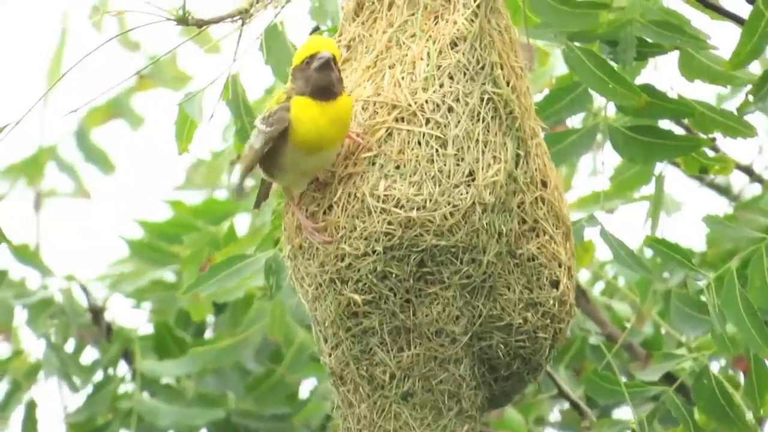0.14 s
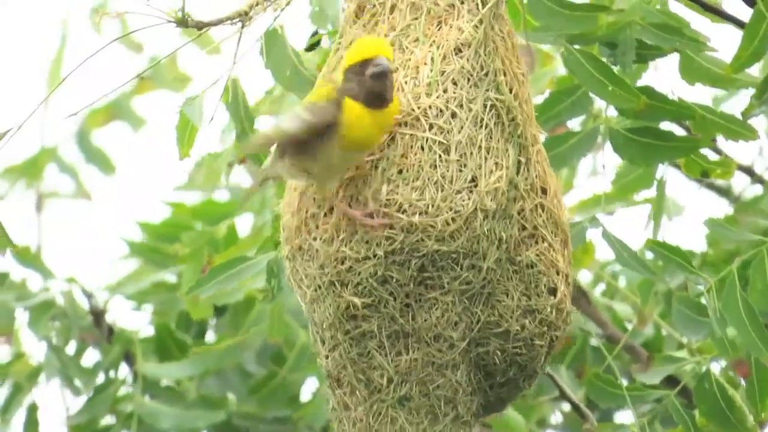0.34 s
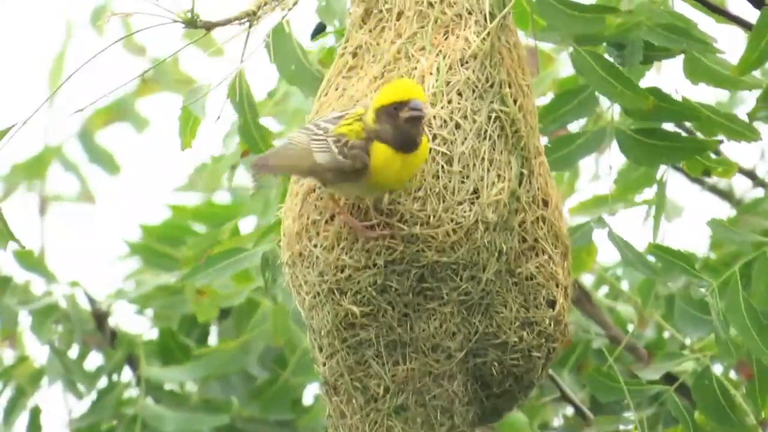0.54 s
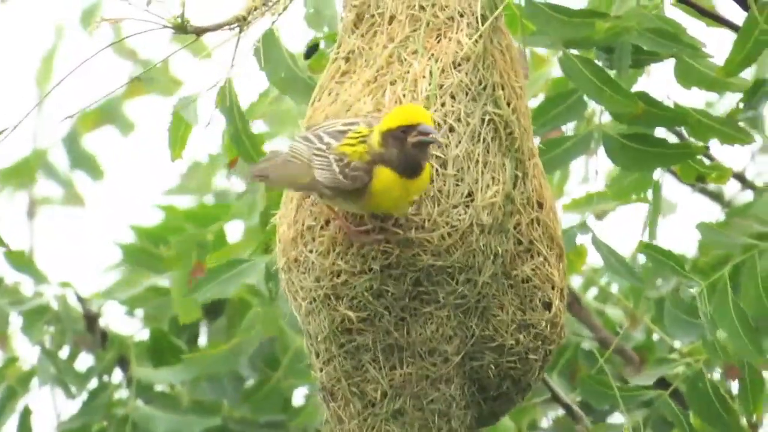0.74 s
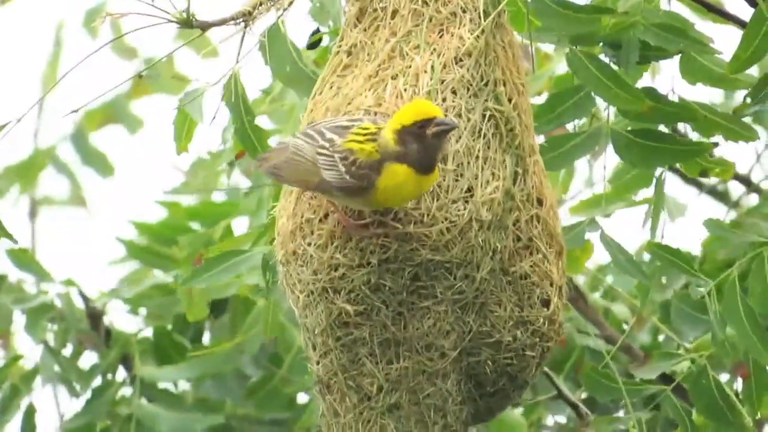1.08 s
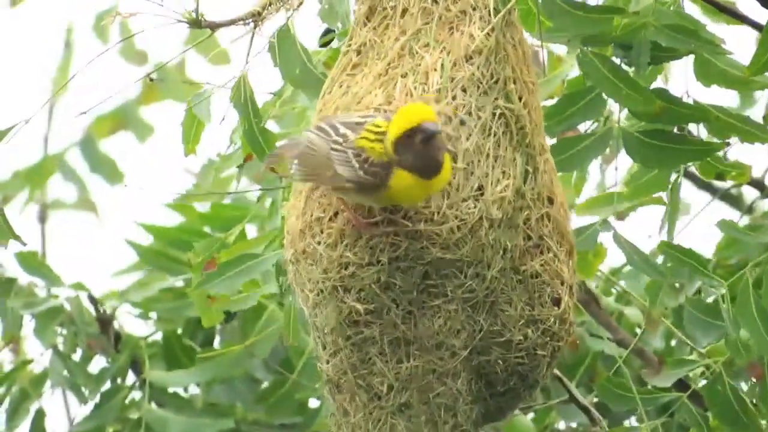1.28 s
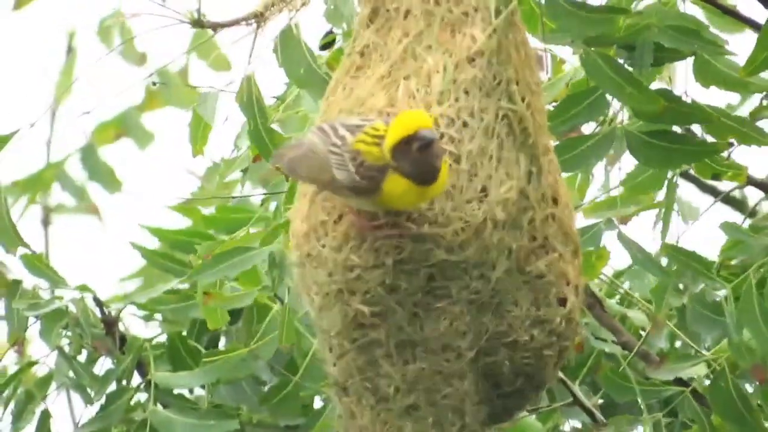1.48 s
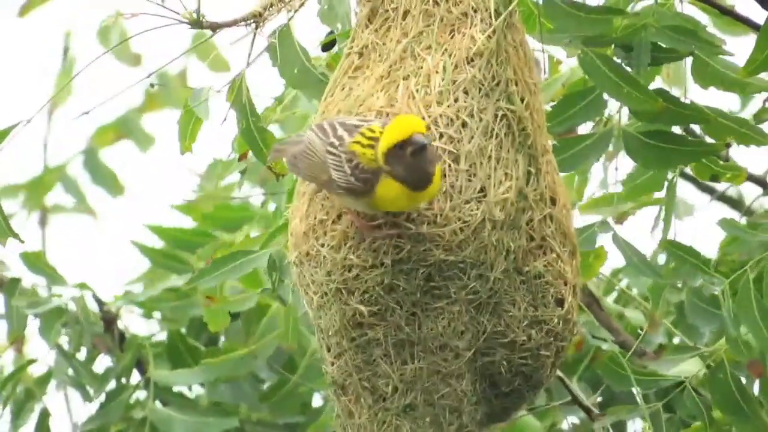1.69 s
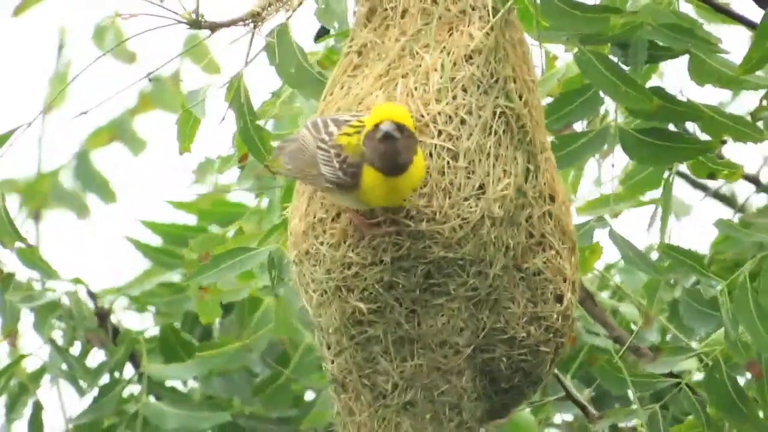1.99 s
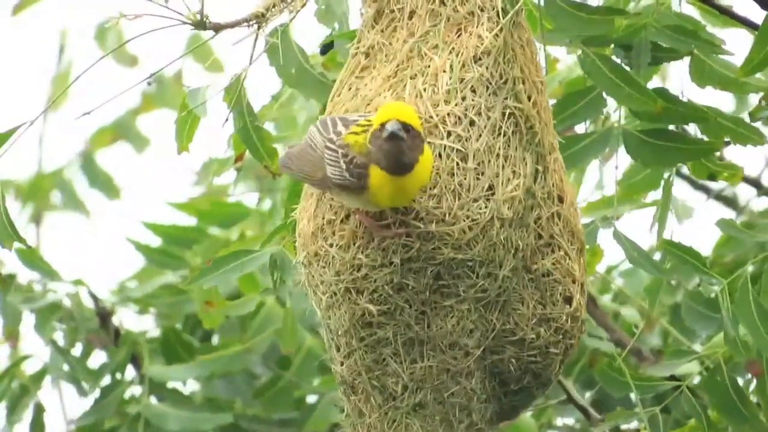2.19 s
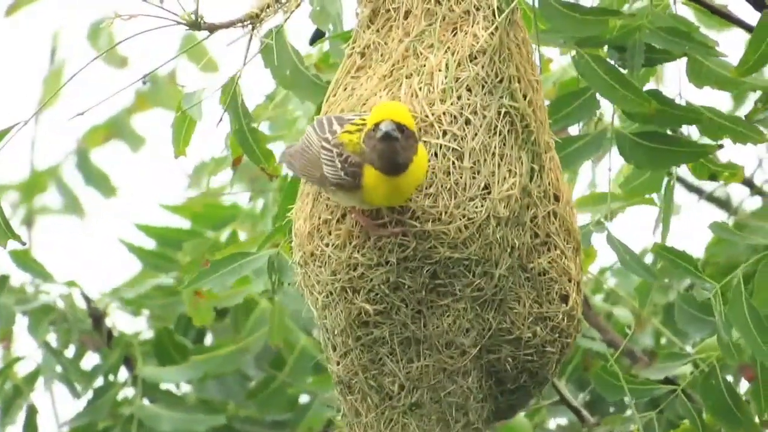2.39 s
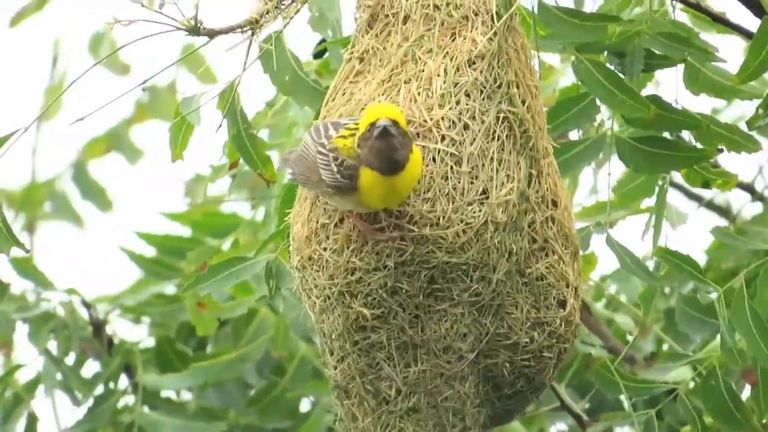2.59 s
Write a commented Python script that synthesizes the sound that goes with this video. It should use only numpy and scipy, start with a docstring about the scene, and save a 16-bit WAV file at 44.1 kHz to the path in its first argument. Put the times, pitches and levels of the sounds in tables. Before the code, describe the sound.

Buzzy chattering of small weaver birds turns to a rising whistle and fluttering wheeze in soft outdoor air

```python
"""Two weavers chatter in buzzy two-voiced trills of quick chips, one topping near 4.5 kHz, the other rougher and
higher near 5 kHz; short notes slide among them and neighbours rasp in swarms of tiny falling chirps.
From 1.6 s thin near-sine whistles follow, one a long upward slide; from 2.4 s a two-voiced wheeze closes the
scene, each voice a line with fluttering side lines. Throughout, leaves scatter the calls as a sparse echo,
over soft wind and hiss made of random spectra."""
import sys
import numpy as np
from scipy import signal
from scipy.io import wavfile
from scipy.ndimage import uniform_filter1d

SR = 44100
rng = np.random.default_rng(int(sys.argv[2]) if len(sys.argv) > 2 else 0)


def to_wav(sig):
    """Store sig (one row per channel, or 1-D mono) as 16-bit WAV at the path in sys.argv[1].

    Samples outside -1..1 are clipped; the rate is SR.
    """
    pcm = np.clip(np.atleast_2d(sig), -1, 1) * 32767
    pcm = np.round(pcm).astype(np.int16)
    wavfile.write(sys.argv[1], SR, pcm.T)  # frames by channels


def elevation(decibels):
    """Turn decibel levels (scalar or array-like) into linear amplitude ratios."""
    levels = np.asarray(decibels, float)
    return 10 ** (levels / 20)


N = 120834  # samples, 2.74 s


def evened(x):
    """Scale to rms 1."""
    return x / np.sqrt(np.mean(x ** 2) + 1e-20)


def read(points, hz):
    """Interpolate a spectrum table over log frequency."""
    f_hz, value = np.transpose(points)
    return np.interp(np.log(hz + 1), np.log(f_hz + 1), value)


def add(mix, start_s, sound):
    """Add a sound into the mix at start_s, cut at the end of the mix."""
    part = mix[max(round(start_s * SR), 0):][:len(sound)]
    part += sound[:len(part)]


def wander(size, rate_hz):
    """Random drift of rms 1: noise low-passed at rate_hz."""
    noise = rng.standard_normal(size + 2000)
    settled = signal.lfilter(*signal.butter(2, rate_hz, fs=SR), noise)[2000:]
    return evened(settled)


def voice(hz, octave_db):
    """One side of the syrinx: a sine of rms 1 plus a weak octave."""
    phase = 2 * np.pi * (np.cumsum(hz) / SR + rng.random())
    return np.sqrt(2) * (np.sin(phase) + elevation(octave_db) * np.sin(2 * phase))


def slide(hz, flat, hoarse, octave_db):
    """A short stroke of the voice along a pitch path; hoarseness shakes both level and pitch."""
    grit_rate_hz, shake_hz = 600, 210
    size = len(hz)
    grit = (1 + hoarse * wander(size, grit_rate_hz)) / np.sqrt(1 + hoarse ** 2)
    shape = np.sin(np.linspace(0, np.pi, size)).clip(0) ** flat
    shaken_hz = hz + hoarse * shake_hz * wander(size, grit_rate_hz)
    return shape * grit * voice(shaken_hz, octave_db)


# trills of both birds: start t/s, length/s, nominal top f/Hz, upper voice level/dB, lower voice level/dB,
# hoarseness (0-1)
TRILL_ROWS = [(.0, 0.027, 4402, -59, -55.5, 0.4), (0.025, 0.0606, 4510, -56.5, -56.5, 0.49),
              (.168, 0.0719, 4566, -53, -57.5, .38), (0.249, 0.0631, 4489, -54, -57.5, .33),
              (0.321, 0.0618, 4477, -51.5, -56, .3), (.395, 0.05066, 4540, -52, -56, 0.28),
              (.495, 0.06064, 5098, -50, -55.5, 0.68), (.627, 0.0293, 4930, -54.5, -53, 0.81),
              (0.644, 0.059, 5144, -50, -55, 0.5), (0.749, 0.0515, 4759, -59, -52.5, 0.57),
              (0.796, .046, 5199, -50.5, -57, 0.8), (0.873, 0.0551, 4847, -55, -53, 0.78),
              (0.982, .06, 5231, -52.5, -60, .75), (1.132, 0.0575, 4723, -57.5, -62, 0.49),
              (1.221, .058, 4620, -55.5, -60.5, 0.42), (1.29, 0.069, 4466, -57.5, -58.5, 0.16),
              (1.366, 0.0668, 4432, -59.5, -58, 0.27), (1.441, 0.071, 4485, -60, -60.5, 0.15),
              (1.516, 0.0473, 4455, -62, -60, 0.36)]
CHIPS_PER_S, TRILL_EDGE_S, TRILL_SAG = 81, .00083, .015  # sag: share of pitch
CHIP_SPREAD_DB, CHIP_SPREAD, CHIP_JITTER_S = 1.7, .014, .002  # rms; jitter when fully hoarse
UPPER_S, UPPER_RISE, UPPER_FALL, UPPER_PEAK = .013, .12, .15, .42  # shares of pitch; peak: share of time
OPENING_RISE = .1  # the first chip climbs from further down
LOWER_S, LOWER_LAG_S, LOWER_FROM_HZ, LOWER_END_HZ = .012, .007, 4300, 2850
TRILL_OCTAVE_DB = -27
HISS_DB, HISS_LOW_HZ, HISS_HIGH_HZ = -4, 3600, 5900  # re upper voice, fully hoarse


def trills():
    """Quick chips: an upper voice arches in pitch, a lagging lower voice sweeps down, the throat hisses."""
    out = np.zeros(N)
    up = np.linspace(0, 1, int(UPPER_S * SR))
    low = np.linspace(0, 1, int(LOWER_S * SR)) ** 0.8584
    rise = UPPER_RISE * (1 - up / UPPER_PEAK) ** 2
    fall = UPPER_FALL * ((up - UPPER_PEAK) / (1 - UPPER_PEAK)) ** 2
    arch = 1 - np.where(up < UPPER_PEAK, rise, fall)
    throat = signal.butter(2, [HISS_LOW_HZ, HISS_HIGH_HZ], "band", fs=SR)
    for start_s, length_s, top_hz, up_db, low_db, hoarse in TRILL_ROWS:
        t = np.arange(0, length_s, 1 / SR)
        hiss = evened(signal.lfilter(*throat, rng.standard_normal(SR // 10)))[:len(t)]
        trill = hoarse ** 2 * elevation(up_db + HISS_DB) * hiss
        for chip_s in np.arange(0, length_s, 1 / CHIPS_PER_S):
            up_luck, low_luck, up_level, low_level, lag_luck = rng.standard_normal(5)
            chip_hz = top_hz * (1 - TRILL_SAG * chip_s / length_s + CHIP_SPREAD * up_luck)
            opening = 1 - OPENING_RISE * (chip_s == 0) * (1 - up) ** 4
            upper = slide(chip_hz * arch * opening, .42, hoarse, TRILL_OCTAVE_DB)
            add(trill, chip_s, elevation(up_db + CHIP_SPREAD_DB * up_level) * upper)
            end_hz = LOWER_END_HZ * (1 + 2 * CHIP_SPREAD * low_luck)
            lower = slide(LOWER_FROM_HZ * (1 - low) + end_hz * low, .11, hoarse, TRILL_OCTAVE_DB)
            lower_s = chip_s + LOWER_LAG_S + hoarse * CHIP_JITTER_S * lag_luck
            add(trill, lower_s, elevation(low_db + CHIP_SPREAD_DB * low_level) * lower)
        edges = np.clip(np.minimum(t, length_s - t) / TRILL_EDGE_S, 0, 1)
        add(out, start_s, trill * edges)
    return out


# short sliding notes: start t/s, length/s, from f/Hz, to f/Hz, level/dB
NOTE_ROWS = [(.3, 0.0363, 2200, 2230, -63.5), (.403, 0.0192, 3206, 2880, -52.5),
             (0.563, 0.0209, 4076, 3218, -53.5), (0.682, 0.0112, 3423, 3300, -55),
             (0.709, 0.0289, 4180, 3150, -55), (0.726, 0.0173, 6980, 4924, -63.5),
             (0.8, 0.0117, 3407, 3280, -52.5), (0.844, 0.022, 3972, 3415, -51),
             (0.92, 0.016, 3517, 3302, -50.5), (1.054, 0.0162, 3946, 3410, -53.5),
             (1.068, 0.0193, 3370, 2480, -63), (0.553, 0.0155, 3367, 3287, -52),
             (1.185, 0.0538, 3728, 3642, -60)]
NOTE_HOARSE, NOTE_OCTAVE_DB = .38, -21


def notes():
    """Single strokes of a slightly hoarse voice, each sliding between two pitches."""
    out = np.zeros(N)
    for start_s, length_s, from_hz, to_hz, db in NOTE_ROWS:
        u = np.arange(0, length_s, 1 / SR) / length_s
        hz = from_hz + (to_hz - from_hz) * u ** 1.42
        add(out, start_s, elevation(db) * slide(hz, .5, NOTE_HOARSE, NOTE_OCTAVE_DB))
    return out


def curve(rows):
    """Start time, soft ends and the columns of a table at audio rate."""
    edge_s = .0056
    rows = np.transpose(rows)
    t = np.arange(rows[0][0], rows[0][-1], 1 / SR)
    ends = np.clip(np.minimum(t - t[0], t[-1] - t) / edge_s, 0, 1)
    return t[0], ends, [np.interp(t, rows[0], column) for column in rows[1:]]


# whistles, one list each: t/s, f/Hz, level/dB
WHISTLE_PATHS = [
    [(1.675, 2138, -73), (1.685, 2148, -69), (1.715, 2398, -62), (1.731, 2507, -63), (1.741, 2515, -57),
     (1.759, 2616, -55), (1.801, 2752, -57), (1.857, 2832, -58), (1.889, 2861, -73), (1.909, 2869, -57),
     (1.943, 2886, -56), (1.957, 2892, -64), (1.987, 2904, -66), (2.005, 2911, -56), (2.119, 2934, -53),
     (2.217, 2933, -54), (2.235, 2934, -68)],
    [(2.322, 3964, -71), (2.33, 3890, -60), (2.352, 3927, -52), (2.386, 3963, -54), (2.398, 3904, -54),
     (2.408, 3807, -66)],
    [(1.64, 5150, -80), (1.66, 4850, -74), (1.7, 4420, -70), (1.73, 4230, -68), (1.775, 4110, -69),
     (1.8, 4050, -80)],
]


def whistles():
    """Near-pure tones of the syrinx along smoothed pitch paths, slightly unsteady in pitch and level."""
    level_wander_db, pitch_wander_hz, octave_db = .79, 4, -42
    out = np.zeros(N)
    for rows in WHISTLE_PATHS:
        start_s, ends, (hz, db) = curve(rows)
        level = elevation(db + level_wander_db * wander(len(hz), 60))
        pitch_hz = uniform_filter1d(hz, 600) + pitch_wander_hz * wander(len(hz), 32)
        add(out, start_s, ends * level * voice(pitch_hz, octave_db))
    return out


# wheeze voices: t/s, main line f/Hz, main line level/dB, flutter depth (0-1)
WHEEZE_LOW_PATH = [(2.4, 3950, -75, .1), (2.42, 3960, -67, .2), (2.5, 3985, -64.5, .3),
                   (2.56, 4030, -63.5, .3), (2.59, 4040, -67, .6), (2.64, 4055, -64, .95),
                   (2.75, 4050, -64.5, .99)]
WHEEZE_HIGH_PATH = [(2.404, 5250, -67, .9), (2.425, 5480, -64.5, .8), (2.455, 5534, -60, .5),
                    (2.5, 5534, -63, .6), (2.55, 5528, -66.5, .8), (2.6, 5530, -65.5, .7),
                    (2.65, 5535, -68, .9), (2.75, 5535, -64, .8)]
# side lines: multiple of the flutter rate, level/dB at depth 0, level/dB at depth 1 (both re main line)
LOW_SIDE_LINES = [(-3, -14, -7), (-2, -7, 2), (-1, -4, -8), (1, -9, -12), (2, -10, -7), (3, -16, -11),
                  (5, -9, -12), (6, -8, -9), (7, -15, -10)]
HIGH_SIDE_LINES = [(-3, -18, -13), (-2, -4, -7), (-1, -13, -8), (1, -15, -3), (2, -18, -14)]
FLUTTER_FROM_HZ, FLUTTER_TO_HZ, FLUTTER_WANDER_HZ = 143, 134, 3.5
WHEEZE_WANDER_HZ, WHEEZE_SETTLE_S, WHEEZE_OCTAVE_DB = 15, .035, -37  # wander: once settled
MAIN_WANDER_DB, SIDE_WANDER_DB = 1.6, 3.2


def wheeze():
    """Two fluttering voices: each a main line, unsteady at first, with side lines at flutter multiples."""
    out = np.zeros(N)
    for rows, sides in ((WHEEZE_LOW_PATH, LOW_SIDE_LINES), (WHEEZE_HIGH_PATH, HIGH_SIDE_LINES)):
        start_s, ends, (hz, db, depth) = curve(rows)
        size = len(hz)
        flutter_hz = np.linspace(FLUTTER_FROM_HZ, FLUTTER_TO_HZ, size)
        flutter_hz = flutter_hz + FLUTTER_WANDER_HZ * wander(size, 46.6)
        unsteady = 1 + 3 * np.exp(-np.arange(size) / SR / WHEEZE_SETTLE_S)
        pitch_hz = hz + WHEEZE_WANDER_HZ * unsteady * wander(size, 61)
        lines = voice(pitch_hz, WHEEZE_OCTAVE_DB) * elevation(MAIN_WANDER_DB * wander(size, 40))
        for multiple, shallow_db, deep_db in sides:
            side_db = shallow_db + (deep_db - shallow_db) * depth + SIDE_WANDER_DB * wander(size, 70)
            lines = lines + elevation(side_db) * voice(pitch_hz + multiple * flutter_hz, WHEEZE_OCTAVE_DB)
        add(out, start_s, ends * elevation(db) * lines)
    return out


# neighbours' rasps: start t/s, length/s, centre f/Hz, nominal width/Hz, level/dB before the edge taper
RASP_ROWS = [(0.018, 0.118, 4310, 2675, -57), (0.289, 0.152, 3977, 2700, -52.5),
             (0.388, .016, 5470, 1500, -57), (0.499, 0.113, 7938, 3000, -74),
             (0.649, 0.087, 8000, 2980, -73.5), (0.782, 0.1193, 7920, 1940, -63.5),
             (0.979, 0.071, 8100, 1500, -69.5), (0.82, .27, 4644, 2887, -57.5),
             (.54, 0.065, 4607, 2400, -59), (.69, .04, 5290, 1500, -54.5),
             (1.109, 0.0744, 3973, 2610, -60.5), (1.39, 0.032, 5514, 900, -61),
             (1.508, 0.0488, 5714, 1190, -58)]
CHIRPS_PER_S, CHIRP_CYCLES, CHIRP_LOWEST_HZ = 1500, 13.8, 800
WIDTH_SCALE, RASP_TAPER = 1.26, .7  # taper: share of the rasp, both edges together


def neighbours():
    """Each rasp is a swarm of tiny falling chirps scattered around its centre pitch."""
    out = np.zeros(N)
    for start_s, length_s, centre_hz, width_hz, db in RASP_ROWS:
        size = int(length_s * SR)
        rasp = np.zeros(size)
        for at, pitch, strength in rng.random((int(CHIRPS_PER_S * length_s) + 3, 3)):
            hz = max(centre_hz + width_hz * WIDTH_SCALE * (pitch - .5), CHIRP_LOWEST_HZ)
            t = np.arange(0, CHIRP_CYCLES / hz, 1 / SR)
            chirp = np.sin(2 * np.pi * hz * t * (1 - .024 * t / t[-1]))  # falls 4.8 %
            add(rasp, at * length_s, (.852 + strength) * np.hanning(len(t)) * chirp)
        add(out, start_s, elevation(db) * evened(rasp) * signal.windows.tukey(size, RASP_TAPER))
    return out


def leaves(birds):
    """Echo off the foliage: sparse random taps that die away, partly different in each ear."""
    t60_s, gap_s, density, apart_share = .07, .003, .05, .5
    t = np.arange(int(.25 * SR)) / SR
    hits = rng.standard_normal((2, len(t))) * (rng.random((2, len(t))) < density)
    both, apart = hits * elevation(-60 * t / t60_s) * (t > gap_s)
    taps = np.array([both + apart_share * apart, both - apart_share * apart])
    taps = taps / np.linalg.norm(taps[0])
    return signal.fftconvolve(birds[None], taps, axes=1)[:, :N]


# air spectrum: f/Hz, relative level/dB (per Hz)
AIR_SPECTRUM = [(12, -38.5), (25, -7), (40, -2.5), (60, 0), (95, -1), (130, -4), (340, -6), (450, -9),
                (560, -12.5), (1010, -16), (1870, -18.5), (3170, -21.5), (4500, -23.5), (7310, -31.5),
                (11000, -38.5), (15500, -47)]
# left-right likeness of the air: f/Hz, correlation (-1 to 1)
AIR_LIKENESS = [(25, .995), (60, .96), (90, .85), (140, .4), (290, -.3), (640, -.1), (1400, .12),
                (3100, .6), (6800, .72), (9000, .74), (15000, .85)]
AIR_DB, PATCH_DB, GUST_DB, GUST_TOP_HZ = -49.5, 1.15, 1.5, 201


def air():
    """Wind rumble and far hiss: random spectra, patchy in time and pitch, with gusts mainly in the bass."""
    frames, hz = N // 512 + 5, np.fft.rfftfreq(2048, 1 / SR)
    a, b, c, d, patches = rng.standard_normal((frames, 1025, 5)).T
    patches = evened(uniform_filter1d(uniform_filter1d(patches, 24, 0), 7, 1))
    gusts = evened(uniform_filter1d(rng.standard_normal(frames), 8))
    same = read(AIR_LIKENESS, hz)[:, None]
    left = a + 1j * b
    right = same * left + np.sqrt(1 - same ** 2) * (c + 1j * d)
    gust_db = GUST_DB * gusts / (1 + (hz[:, None] / GUST_TOP_HZ) ** 2)
    level_db = read(AIR_SPECTRUM, hz)[:, None] + PATCH_DB * patches + gust_db
    spectra = np.array([left, right]) * elevation(level_db)
    return elevation(AIR_DB) * evened(signal.istft(spectra, nperseg=2048, noverlap=1536)[1][:, :N])


def scene():
    """All birds, slightly right of centre, with their echo and the air."""
    leaves_db = -11
    birds = trills() + notes() + whistles() + wheeze() + neighbours()
    direct = birds * elevation(np.array([[-.2], [.2]]))
    return direct + elevation(leaves_db) * leaves(birds) + air()


def roll_off(x):
    """The treble ends steeply here."""
    return signal.sosfilt(signal.butter(12, 15640, fs=SR, output="sos"), x)


def record(dry):
    """Deliver the finished mix."""
    return roll_off(dry)


dry = scene()
out = record(dry)
to_wav(out)
```